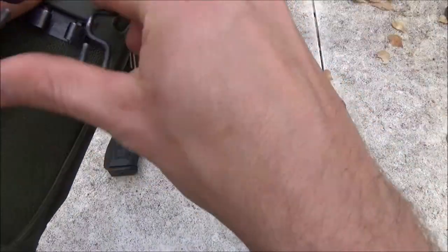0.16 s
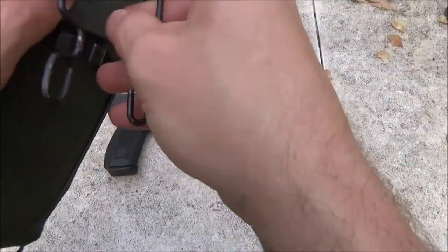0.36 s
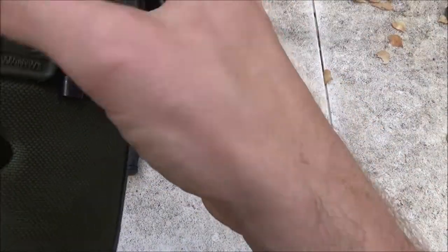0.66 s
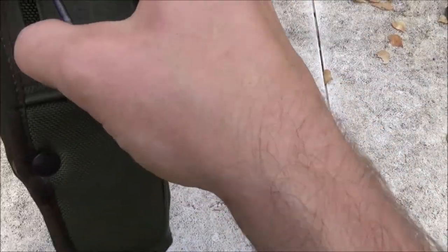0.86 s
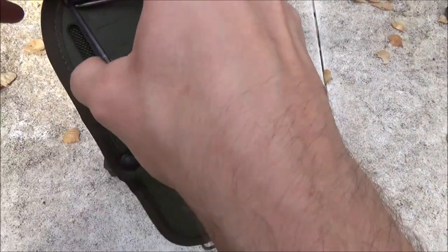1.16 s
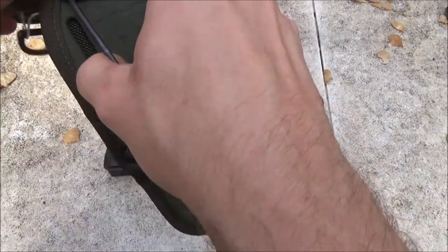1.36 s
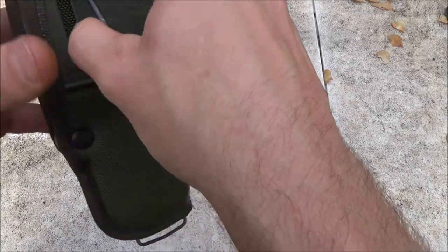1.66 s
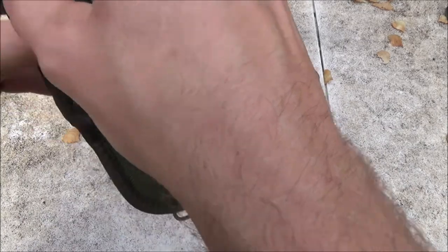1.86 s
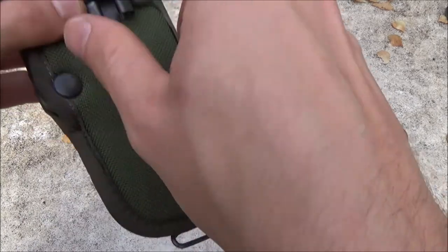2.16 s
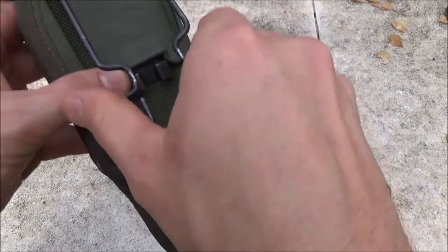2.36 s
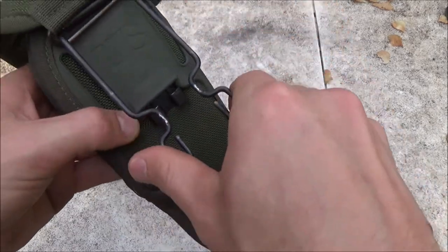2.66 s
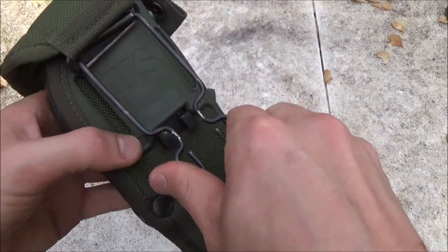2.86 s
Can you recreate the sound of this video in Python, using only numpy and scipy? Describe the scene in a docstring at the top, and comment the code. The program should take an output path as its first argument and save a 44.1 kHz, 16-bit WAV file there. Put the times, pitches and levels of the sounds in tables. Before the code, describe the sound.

Sharp metallic clicks and pings of a wire belt clip, with short dry fabric rubs between

```python
"""Steel snaps, ticks and short rubbing strokes are heard over a quiet steady background.
Hands turn a stiff fabric holster over a concrete pavement and work its steel wire belt clip.
The wire snaps on its catch: chattering contacts drive damped modes, with a crack and a ping; some ring on.
Small catches tick, and dense slips make the wire sing. Random grains of the weave hiss and sound the hollow
holster, with faint crackles and soft low thuds of the hand. Short scatter from hands and ground follows."""
import sys
import numpy as np
from scipy import signal
from scipy.fft import rfft, irfft
from scipy.io import wavfile

SR = 44100
rng = np.random.default_rng(int(sys.argv[2]) if len(sys.argv) > 2 else 0)


def to_wav(sig):
    """Store sig (one row per channel, or 1-D mono) as 16-bit WAV at the path in sys.argv[1].

    Samples outside -1..1 are clipped; the rate is SR.
    """
    pcm = np.clip(np.atleast_2d(sig), -1, 1) * 32767
    pcm = np.round(pcm).astype(np.int16)
    wavfile.write(sys.argv[1], SR, pcm.T)  # frames by channels


N = 132300
TIME = np.arange(N) / SR
HIT_SIZE = 4096  # samples
HIT_TIME = TIME[:HIT_SIZE]
LEVEL_WINDOW_S = 0.01  # a hit at 0 dB has the energy of a unit level held this long
CUTOFF_HZ = 16000

# Steady air, spectrum: pitch_hz, level_db (relative)
BACKGROUND_COLOUR = [(25, -35), (50, -17), (100, -14.5), (200, -4), (400, 1), (800, 1), (1200, 5),
                     (2000, -1.5), (3200, -1), (5000, -6), (8200, -8.5), (12000, -15), (16000, -20)]
BACKGROUND_MID_DB, SIDE_OVER_MID_DB = -57.5, -8.5

# The palm bumps the holster: peak_s, level_db
BUMPS = [(.245, -55), (.5, -60), (1.63, -61.5), (2.0, -64), (2.135, -53)]
# Thud spectrum: pitch_hz, level_db (relative)
BUMP_COLOUR = [(25, -17), (70, -13), (140, 2), (250, 0.5), (600, -9.5)]
BUMP_WIDTH_S = 0.022

# Fabric tick and crackle spectrum: pitch_hz, level_db (relative)
FABRIC_COLOUR = [(400, -20.5), (900, -2.5), (1400, 8), (2200, -2), (4000, 10), (6500, 9.5), (8500, 13),
                 (11500, -3.5), (13500, -16), (16000, -39)]
CRINKLES_PER_S, CRINKLE_DECAY_S = 99, 0.0018
CRINKLE_DB, CRINKLE_SPREAD_DB = -60.5, 3  # level where the movement gain is 1
CRINKLE_AT_REST = 0.3  # gain

# Rubbing strokes: peak_s, rise_s, fall_s, body_level_db, hiss_level_db, body_pitch_hz
STROKES = [(.18, 0.028, .03, -51.5, -55.5, 1080), (0.221, 0.017, 0.032, -39, -67, 1810),
           (.255, 0.021, 0.028, -39.5, -41, 1020), (0.34, .012, 0.049, -44, -50, 750),
           (0.367, 0.0073, 0.019, -61, -39, 980), (0.439, 0.018, 0.02, -50, -46.5, 1110),
           (0.494, 0.017, 0.024, -37.5, -32.5, 970), (0.546, 0.0086, 0.022, -53, -41, 1200),
           (0.626, 0.032, 0.021, -47, -47, 1200), (.742, 0.033, 0.012, -52, -51.5, 1300),
           (.795, 0.035, 0.04, -57, -50.5, 1310), (.935, 0.014, 0.018, -51.5, -45.5, 1040),
           (1.035, 0.037, 0.016, -53, -49, 1240), (1.082, 0.016, 0.0098, -48.5, -36, 805),
           (1.204, 0.051, 0.04, -52, -43, 1260), (1.294, 0.017, 0.014, -59.5, -44, 1280),
           (1.484, 0.042, 0.043, -53, -50, 1290), (1.714, 0.033, 0.012, -58.5, -58, 1080),
           (1.775, 0.044, 0.077, -49.5, -50, 1020), (1.877, 0.024, 0.049, -49, -48.5, 1230),
           (1.992, 0.062, 0.041, -48, -52.5, 1460), (2.08, 0.02, .03, -55, -56, 1270),
           (2.115, 0.012, 0.045, -58, -47.5, 1300), (2.253, 0.0069, 0.013, -45, -41.5, 1280),
           (2.3, 0.016, 0.017, -56.5, -63, 1300), (2.371, 0.018, 0.015, -49, -47, 1170),
           (2.65, 0.018, 0.0079, -60, -64, 1200), (2.705, 0.0073, 0.02, -65, -60.5, 1200),
           (2.97, 0.021, 0.037, -55, -54.5, 970)]
# Spectrum of the weave's body: pitch_hz, density_db (relative, per Hz)
RUB_BODY_COLOUR = [(25, -42), (60, -41), (150, -25), (330, -6.5), (700, 1), (1250, 4), (1800, 0),
                   (2400, -5), (4000, -44)]
# Spectrum of the weave's hiss before folds: pitch_hz, density_db (relative, per Hz)
RUB_HISS_COLOUR = [(40, -55), (1200, -21), (2400, 0), (3700, 3), (4900, 1.5), (6200, -1.5), (7000, -1.5),
                   (8200, 1.5), (10000, -6.5), (11800, -10), (13200, -17), (16000, -16)]
GRAINS_PER_S, GRAIN_SPREAD_DB = 5000, 3.5
FLUTTER_DB, FLUTTER_HZ = 2.5, 89  # rms depth, fastest rate
RIB_SLIPS_PER_S, RIB_DB = 260, -2.5  # level against the fine grain
HOLLOW_T60_S, HOLLOW_DB = 0.0051, 6  # level against the weave's body
FOLD_DB, FOLD_WIDTH_HZ = 5, 454

# The wire drags over its catch: peak_s, rise_s, fall_s, low_level_db, middle_level_db, top_level_db
SCRAPES = [(.44,.01,0.014,-52,-46,-56), (.49,0.0055,.02,-40,-41,-48), (0.937,.008,0.0072,-43,-44.5,-48),
           (1.082,.008,0.011,-45,-40.5,-59), (1.196,0.013,0.018,-39,-39.5,-37.5),
           (1.29,0.009,.02,-55,-52,-57), (1.87,0.0084,0.028,-64,-49,-69),
           (2.085,0.034,0.037,-47.5,-50.5,-58), (2.37,0.015,0.0074,-48,-49,-64)]
# Modes of the pressed wire: pitch_hz, level_db (relative), t60_s
SCRAPE_MODES = [(3180,-5.5,0.034), (3604,-6,0.051), (3850,-5,0.017), (4130,-3,0.05), (6070,1,0.018),
                (7760,0.5,0.034), (8400,-5.5,0.014), (9270,-0.5,0.011), (10750,8,0.01), (12000,3,0.021)]
# Borders of the low, middle and top scrape modes: pitch_hz
SCRAPE_EDGES_HZ = [0, 5000, 10000, 20000]

CLIP_MODES = [(880, -3.5, .012), (1276, 1, 0.019), (1703, -5.5, 0.015), (2990, -8.5, 0.016),
              (3480, -0.5, 0.0099), (3954, -1.5, 0.019), (4263, -1.5, 0.015), (4890, -4, 0.0037),
              (6135, -1.5, 0.014), (6640, -5, 0.027), (7320, -4, .016), (8000, 10, 0.011), (8340, 6, 0.011),
              (8840, 3, 0.014), (9710, -1.5, 0.01), (11040, -8.5, 0.017), (11930, -6.5, 0.008),
              (13560, -5, 0.0068), (14650, -9, .009)]
MOST_CYCLES = 160  # the grip lets no mode's t60 last longer
CONTACT_DECAY_S, CONTACT_RISE_S = 0.0012, 0.00055
CHATTER_PER_S, CHATTER_DB = 12000, 14  # kicks against the first touch, before rise and decay

# Small catches of wire and seams: start_s, low_level_db, middle_level_db, treble_level_db (before trim)
TICKS = [(0.0047, -46.5, -71, -62), (0.01, -44.5, -45.5, -51), (0.0244, -47, -64, -67),
         (0.0859, -39.5, -53, -48), (0.0889, -42, -43.5, -54), (0.102, -44, -51, -53),
         (0.1643, -38, -57, -54), (0.2404, -57, -35.5, -39), (0.2467, -40.5, -32, -26.5),
         (0.2683, -49, -56, -36), (0.32, -44, -44.5, -43.5), (0.333, -50, -46, -55),
         (0.364, -57, -44, -35.5), (0.4375, -58, -38.5, -34.5), (0.4849, -40.5, -33, -42),
         (0.535, -49, -49, -38.5), (0.5693, -46, -41, -38.5), (0.632, -66, -44, -48),
         (0.7736, -41.5, -66, -57), (0.7759, -44.5, -42, -45), (0.8313, -48, -45.5, -42),
         (0.8985, -53, -47, -59), (0.908, -50.5, -72, -45), (0.9208, -74, -46, -42.5),
         (0.936, -40, -30.5, -32.5), (0.99, -48, -45.5, -48.5), (1.059, -38, -35, -30),
         (1.0702, -71, -53, -41), (1.0784, -46.5, -35.5, -32.5), (1.0834, -47, -42, -36),
         (1.2842, -52, -44.5, -42.5), (1.3051, -60, -65, -47), (1.3764, -51.5, -45, -45.5),
         (1.6245, -44, -41, -40), (1.6335, -41, -35.5, -32.5), (1.7428, -43, -38, -43),
         (1.8123, -40, -36, -39), (1.8558, -36.5, -32, -33), (2.0109, -38.5, -32, -32.5),
         (2.073, -53, -41, -40), (2.0778, -43, -36.5, -39), (2.095, -57, -37.5, -36),
         (2.106, -43.5, -37, -36), (2.1306, -41, -59, -41), (2.3883, -52, -43.5, -50),
         (2.7214, -45, -46, -45.5), (2.9168, -53, -50, -47)]
# Borders of the low, middle and treble tick bands: pitch_hz
TICK_EDGES_HZ = [450, 2200, 6500, 15500]
TICK_DECAYS_S = (0.0023, 0.0025, 0.0025)  # low, middle, treble
TICK_STEEL_DB, TICK_TRIM_DB = -8.5, -0.5  # steel against fabric; trim on all ticks

# The wire is left free and rings on: start_s, low_level_db, high_level_db
FREE_RINGS = [(2.0608, -40, -52), (2.1543, -45, -55), (2.2539, -41, -34.5), (2.355, -57, -66)]
# Lasting modes of the free wire: pitch_hz, level_db (relative), t60_s
FREE_MODES = [(3247, -10, 0.42), (4060, -2, 0.071), (4580, -6.5, 0.19), (7400, 3.5, 0.062)]
FREE_SPLIT_HZ = 3800  # border of low and high modes

# The wire snaps home: start_s, body_level_db, modes_4k_level_db, modes_6k_level_db, modes_8k_level_db,
# top_level_db (these five before trim), ping_hz, ping_level_db (before its rise and decay)
SNAPS = [(0.3959,-41,-30.5,-36,-25.5,-29.5,4270,-20.5), (.48,-43,-31.5,-35,-23.5,-47,4030,-24),
         (0.499,-43,-33,-45,-21,-46,4060,-28), (0.5069,-39.5,-26,-36,-28,-27,4230,-15.5),
         (1.493,-41,-28,-40.5,-39,-35,3960,-57), (1.6385,-40.5,-32.5,-34,-33.5,-35.5,4200,-33),
         (2.0166,-35.5,-34,-26.5,-23.5,-31.5,4030,-25.5), (2.0582,-43,-29,-36.5,-23.5,-38.5,4010,-30),
         (2.1516,-38.5,-28,-28.5,-25.5,-32.5,3250,-31), (2.2532,-43.5,-30,-25,-27.5,-31.5,4016,-20),
         (2.355,-40.5,-31.5,-47,-24.5,-40,4130,-28), (2.5301,-42,-32.5,-40,-35.5,-36.5,4280,-32),
         (2.7935,-42,-34,-47.5,-33,-36,4190,-38)]
# Borders of the five snap bands: pitch_hz
SNAP_EDGES_HZ = [0, 2200, 5200, 7200, 9500, 20000]
SNAP_TRIM_DB, PING_T60_S = -1, 0.047
CRACK_DB, CRACK_DECAY_S = -9, 0.0018  # level against the steel

# Spectrum of the scatter: pitch_hz, level_db (relative)
ECHO_COLOUR = [(100,-2), (300,-2), (700,6.5), (1500,3), (4000,-4), (6500,-5), (8200,0.5), (10500,-2),
               (16000,5)]
ECHO_DB, ECHO_DELAY_S, ECHO_DECAY_S = -12.5, 0.00213, 0.0047

# Left port's level over the right: pitch_hz, level_db
LEFT_OVER_RIGHT = [(60,2), (250,-2), (700,2.3), (1300,1.5), (2500,1), (8200,0.9), (14000,-1)]
# Left port's phase lead over the right: pitch_hz, phase_rad
LEFT_LEADS = [(30,0), (200,0.54), (800,-0.44), (2000,-0.64), (4500,-0.37), (8200,0.36), (14000,-0.066)]


def from_db(db):
    """Turn decibels into gain."""
    return 10 ** (np.asarray(db) / 20)


def rms_one(x):
    """Scale a sound to rms 1."""
    return x / np.sqrt(np.mean(x ** 2) + 1e-24)


def unit_hit(x):
    """Scale a hit to the energy of a unit level held for one level window."""
    return x * np.sqrt(LEVEL_WINDOW_S * SR / (np.sum(x ** 2) + 1e-24))


def add(out, start_s, x):
    """Mix x in at its start time."""
    i = int(np.clip(start_s * SR, 0, N - 1))
    out[i:i + len(x)] += x[:N - i]


def at_bins(points, size):
    """Read a frequency table at the bins of a transform, along log frequency."""
    hz, value = np.transpose(points)
    bins_hz = np.arange(size // 2 + 1) * SR / size
    return np.interp(np.log(bins_hz + 1), np.log(hz), value)


def colour(x, points):
    """Give noise a spectrum; rms 1."""
    gain = from_db(at_bins(points, len(x)))
    return rms_one(irfft(rfft(x) * gain, len(x)))


def band(x, low, high):
    """Pass only the band between two frequencies."""
    return signal.sosfilt(signal.butter(2, [low, high], "band", fs=SR, output="sos"), x)


def ring(x, hz, t60):
    """One mode as a resonator: a unit click starts a decaying tone of about height 1."""
    radius = from_db(-60 / (t60 * SR))
    turn = 2 * np.pi * hz / SR
    poles = [1, -2 * radius * np.cos(turn), radius * radius]
    return signal.lfilter([.5, 0, -.5], poles, x + 1e-18)


def ring_modes(force, modes):
    """Drive a set of modes with one force; neighbours in the set alternate in sign."""
    return sum((-1) ** k * from_db(db) * ring(force, hz, t60) for k, hz, db, t60 in modes)


def modes_between(modes, low, high):
    """Pick the modes of one frequency band, each with its place in the table."""
    return [(k, hz, db, t60) for k, (hz, db, t60) in enumerate(modes) if low <= hz < high]


def stroke(peak_s, rise, fall):
    """Pressure of one stroke: a rounded peak with exponential flanks."""
    away = (TIME - peak_s) / np.where(TIME < peak_s, rise, fall)
    return np.exp(2 - 2 * np.sqrt(1 + away ** 2))


def background():
    """Quiet steady air, mostly alike on both sides."""
    mid, side = (colour(rng.standard_normal(N), BACKGROUND_COLOUR) for _ in range(2))
    opposed = side * np.array([[1], [-1]])
    return from_db(BACKGROUND_MID_DB) * (mid + from_db(SIDE_OVER_MID_DB) * opposed)


def bumps():
    """Soft low thuds of the hand: bell-shaped pushes of coloured noise."""
    push = sum(from_db(db) * np.exp(-((TIME - s) / BUMP_WIDTH_S) ** 2) for s, db in BUMPS)
    return push * colour(rng.standard_normal(N), BUMP_COLOUR)


def crinkles():
    """The gripped fabric gives faint, scattered crackles, stronger during the strokes."""
    moving = CRINKLE_AT_REST + np.minimum(sum(stroke(*row[:3]) for row in STROKES), 1)
    size = from_db(CRINKLE_SPREAD_DB * np.minimum(rng.exponential(1, N), 3))
    born = (rng.random(N) < CRINKLES_PER_S / SR) * size
    bursts = signal.lfilter([1], [1, -np.exp(-1 / (CRINKLE_DECAY_S * SR))], born + 1e-18)
    crackle = colour(bursts * rng.standard_normal(N), FABRIC_COLOUR)
    return from_db(CRINKLE_DB) * moving * crackle


def flutter():
    """Quick random gain of a sticking and slipping contact."""
    lowpass = signal.butter(2, FLUTTER_HZ, fs=SR, output="sos")
    slow = signal.sosfilt(lowpass, rng.standard_normal(N))
    return from_db(FLUTTER_DB * rms_one(slow))


def grains():
    """Threads of the weave let go one by one, mostly small, a few large."""
    size = from_db(GRAIN_SPREAD_DB * np.minimum(rng.exponential(1, N), 5))
    born = rng.random(N) < GRAINS_PER_S / SR
    return born * size * rng.choice([-1, 1], N) * flutter()


def ribs():
    """Coarse slips over the ribs of the weave, on top of the fine grain."""
    slips = (rng.random(N) < RIB_SLIPS_PER_S / SR) * rng.uniform(0.43, 1, N)
    return rms_one(grains()) + from_db(RIB_DB) * rms_one(slips)


def folds(x):
    """Each grip folds the fabric anew and gives its hiss other peaks and dips."""
    place = np.arange(N // 2 + 1) * SR / N / FOLD_WIDTH_HZ
    ripple = np.interp(place, np.arange(256), rng.standard_normal(256))
    return rms_one(irfft(rfft(x) * from_db(FOLD_DB * ripple), N))


def rubbing():
    """Each stroke swells and fades: grains hiss on the weave and sound the hollow holster."""
    out, drive = np.zeros(N), ribs()
    weave, hiss = colour(grains(), RUB_BODY_COLOUR), colour(grains(), RUB_HISS_COLOUR)
    for peak_s, rise, fall, body_db, hiss_db, hz in STROKES:
        hollow = rms_one(ring(drive, hz, HOLLOW_T60_S))
        body = rms_one(weave + from_db(HOLLOW_DB) * hollow)
        rub = from_db(body_db) * body + from_db(hiss_db) * folds(hiss)
        out += stroke(peak_s, rise, fall) * rub
    return out


def scrapes():
    """Dense slips of steel on steel drive the wire's narrow modes; the point of contact favours some of them."""
    out, slips = np.zeros(N), grains()
    for group, (low, high) in enumerate(zip(SCRAPE_EDGES_HZ, SCRAPE_EDGES_HZ[1:])):
        singing = rms_one(ring_modes(slips, modes_between(SCRAPE_MODES, low, high)))
        pressure = sum(from_db(levels[group]) * stroke(s, rise, fall) for s, rise, fall, *levels in SCRAPES)
        out += singing * pressure
    return out


def seating():
    """Force builds up as the wire seats."""
    return 1 - np.exp(-HIT_TIME / CONTACT_RISE_S)


def contact():
    """A first touch followed by a brief chatter of random kicks."""
    force = (rng.random(HIT_SIZE) < CHATTER_PER_S / SR) * rng.standard_normal(HIT_SIZE)
    force *= from_db(CHATTER_DB) * seating() * np.exp(-HIT_TIME / CONTACT_DECAY_S)
    force[0] = 1
    return force


def steel(force, low, high):
    gripped = [(k, hz, db, min(t60, MOST_CYCLES / hz)) for k, hz, db, t60 in modes_between(CLIP_MODES, low, high)]
    return unit_hit(ring_modes(force, gripped))


def ticks():
    """Small catches: a dry burst of fabric with a touch of steel."""
    out = np.zeros(N)
    for start_s, *levels in TICKS:
        force, scuff = contact(), colour(rng.standard_normal(HIT_SIZE), FABRIC_COLOUR)
        for db, low, high, decay in zip(levels, TICK_EDGES_HZ, TICK_EDGES_HZ[1:], TICK_DECAYS_S):
            burst = unit_hit(band(scuff * np.exp(-HIT_TIME / decay), low, high))
            tick = unit_hit(burst + from_db(TICK_STEEL_DB) * steel(force, low, high))
            add(out, start_s, from_db(db + TICK_TRIM_DB) * tick)
    return out


def free_ring():
    """The thin after-ring of the wire when nothing damps it: clicks start its lasting modes."""
    low, high = np.zeros((2, N))
    for start_s, low_db, high_db in FREE_RINGS:
        add(low, start_s, from_db([low_db]))
        add(high, start_s, from_db([high_db]))
    return sum(from_db(db) * ring(low if hz < FREE_SPLIT_HZ else high, hz, t60) for hz, db, t60 in FREE_MODES)


def snaps():
    """Each snap strikes the groups of modes with its own strengths, with a short crack and a ping that the grip tunes."""
    out = np.zeros(N)
    for start_s, *levels, ping_hz, ping_db in SNAPS:
        ping = from_db(ping_db - 60 * HIT_TIME / PING_T60_S) * np.sin(2 * np.pi * ping_hz * HIT_TIME)
        add(out, start_s, seating() * ping)
        force = contact()
        for db, low, high in zip(levels, SNAP_EDGES_HZ, SNAP_EDGES_HZ[1:]):
            noise = rng.standard_normal(HIT_SIZE) * seating() * np.exp(-HIT_TIME / CRACK_DECAY_S)
            crack = unit_hit(band(noise, max(low, 600), min(high, CUTOFF_HZ)))
            snap = unit_hit(steel(force, low, high) + from_db(CRACK_DB) * crack)
            add(out, start_s, from_db(db + SNAP_TRIM_DB) * snap)
    return out


def echoes(x):
    """Short scatter from hands and ground: a delayed, decaying noise tail, different on each side."""
    late = HIT_TIME - ECHO_DELAY_S
    fade = (late > 0) * np.exp(-np.abs(late) / ECHO_DECAY_S)
    sides = []
    for _ in range(2):
        tail = colour(rng.standard_normal(HIT_SIZE), ECHO_COLOUR) * fade
        tail /= np.sqrt(np.sum(tail ** 2))  # unit energy
        sides.append(signal.fftconvolve(x, tail)[:N])
    return from_db(ECHO_DB) * np.array(sides)


def scene():
    """All handling sounds with their scatter, over the background."""
    handling = snaps() + free_ring() + ticks() + rubbing() + scrapes() + crinkles() + bumps()
    return handling + echoes(handling) + background()


def record(dry):
    """Two close microphone ports differ a little in level and phase; the top is cut."""
    # each port takes half of the difference
    half = from_db(at_bins(LEFT_OVER_RIGHT, N) / 2) * np.exp(.5j * at_bins(LEFT_LEADS, N))
    ports = irfft(rfft(dry) * np.array([half, 1 / half]), N)
    return signal.sosfilt(signal.ellip(10, .2, 80, CUTOFF_HZ, fs=SR, output="sos"), ports)


dry = scene()
out = record(dry)
to_wav(out)
```